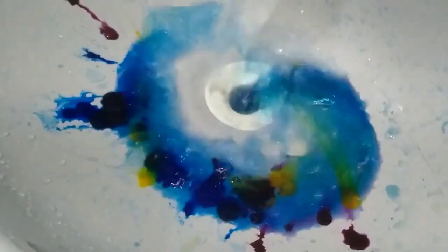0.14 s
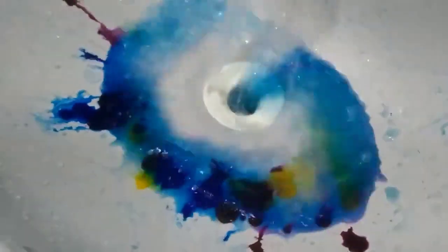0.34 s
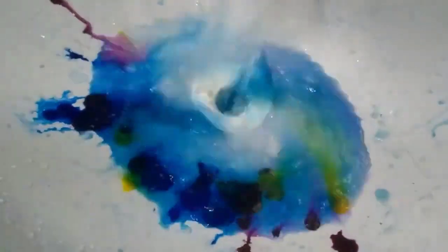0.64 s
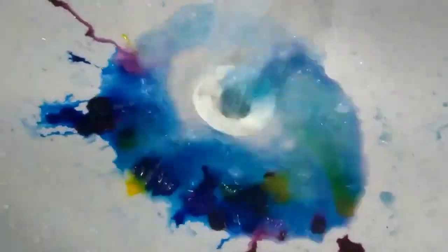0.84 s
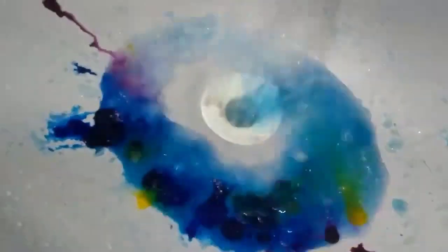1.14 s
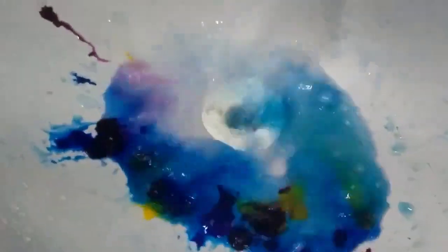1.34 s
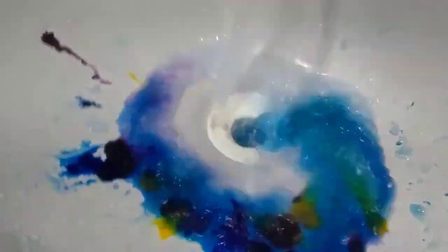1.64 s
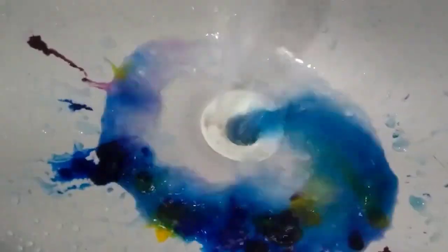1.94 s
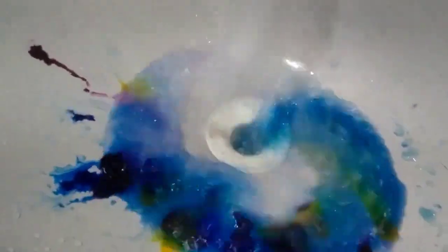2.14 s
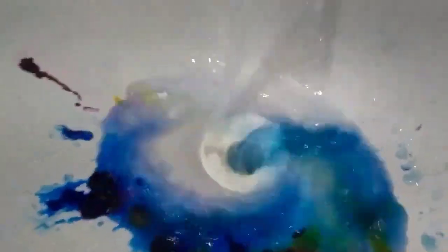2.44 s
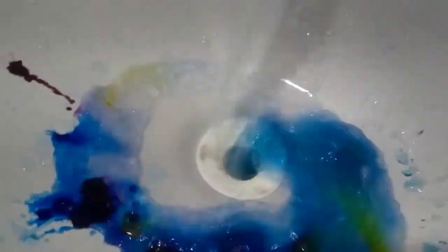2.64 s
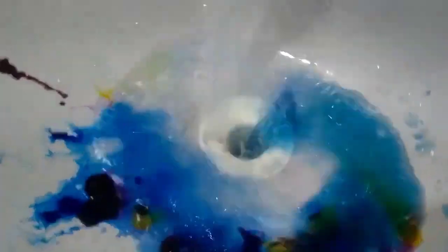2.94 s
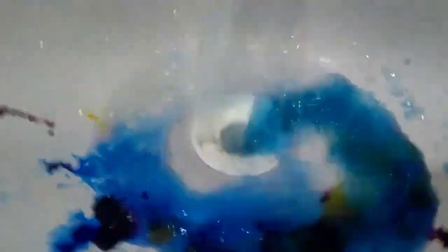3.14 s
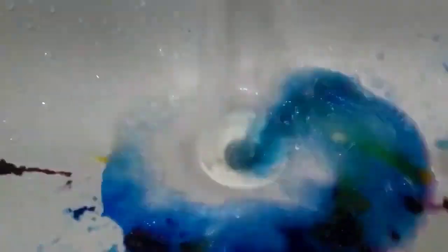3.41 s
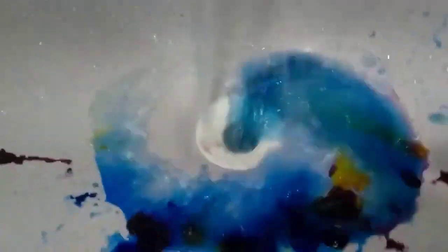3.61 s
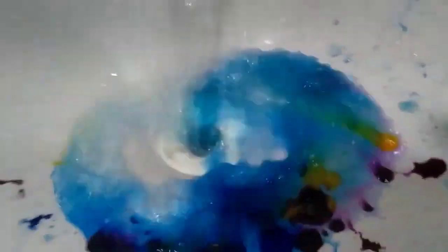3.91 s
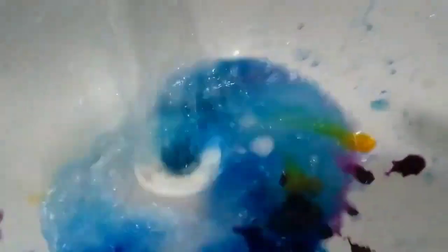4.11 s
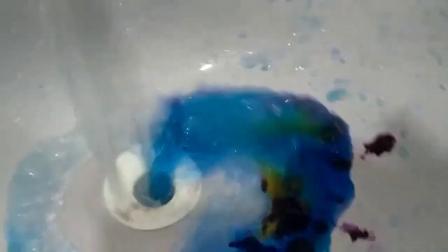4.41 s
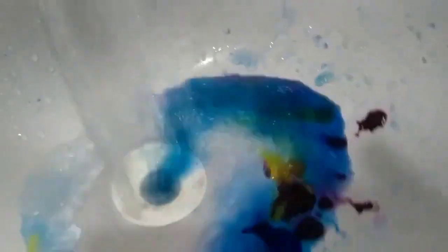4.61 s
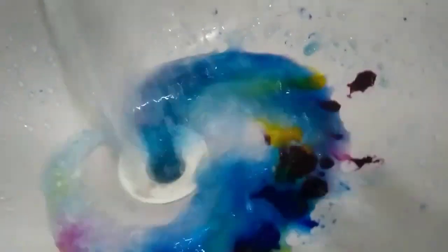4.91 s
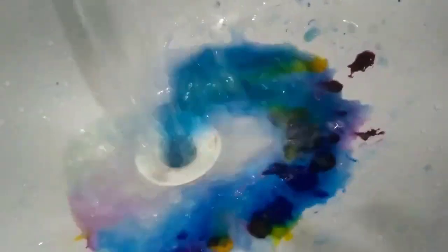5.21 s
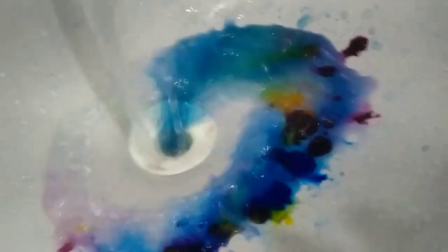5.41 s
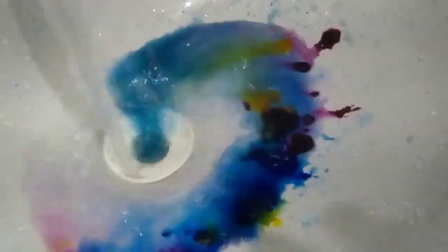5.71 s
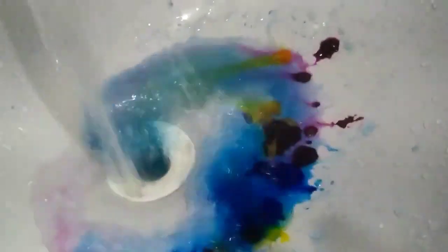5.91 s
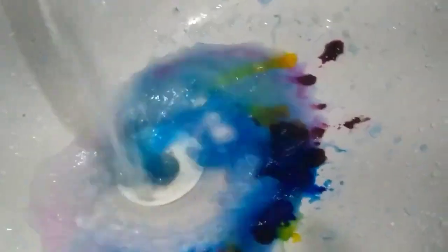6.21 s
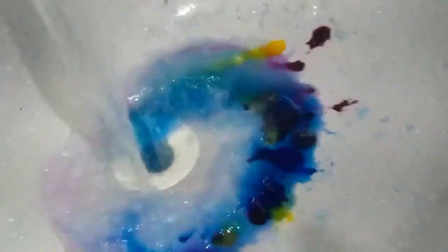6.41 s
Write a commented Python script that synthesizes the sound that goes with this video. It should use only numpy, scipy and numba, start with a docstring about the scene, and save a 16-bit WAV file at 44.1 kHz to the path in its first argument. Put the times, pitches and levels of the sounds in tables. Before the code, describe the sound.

Heard from close above a ceramic washbasin, a tap jet runs without pause, making a bright hiss of spray and a fizz of tiny bubbles. Several times a second it gulps air, giving short gurgles round the drain. Clear blips chirp upward, bubbles pop wetly and droplets tick on the glaze. A faint low bowl rumble lies beneath, and the tiles add a short tail.

```python
"""In a small tiled bathroom a tap runs steadily into a ceramic washbasin, heard from close above.
The jet hisses as spray (a dense crowd of droplet ticks) and fizzes as splash (a crowd of tiny bubbles).
A few times a second it gulps air into the water round the drain, which gurgles and churns (larger bubbles).
Single bubbles blip and pop and droplets tick, each a short ring. Filtered noise makes the faint rumble
of the bowl and the ring of the waste pipe; the tiles add a short echoing tail."""
import sys
import numpy as np
from scipy import signal
from scipy.fft import rfft, irfft
from scipy.io import wavfile
from scipy.ndimage import uniform_filter1d
from numba import njit

SR = 44100
rng = np.random.default_rng(int(sys.argv[2]) if len(sys.argv) > 2 else 0)


def master_out(mix):
    """Clip the mix to full scale and print it as 16-bit PCM to the path in sys.argv[1]."""
    frames = np.transpose(np.atleast_2d(mix))
    ceiling = np.clip(frames, -1, 1)
    pcm = np.round(ceiling * 32767).astype(np.int16)
    wavfile.write(sys.argv[1], SR, pcm)


N = 288855
TOP_HZ = 15400  # upper limit of the whole sound


def undb(db):
    """Turn decibels into a gain."""
    return 10 ** (np.asarray(db) / 20)


def controls(table):
    """Draw each column of a time table as a curve with a value at every sample."""
    s, *columns = np.transpose(table)
    t = np.arange(N) / SR
    return [np.interp(t, s, column) for column in columns]


def bins():
    """List the frequencies in the spectrum of a whole signal, in Hz."""
    return np.arange(N // 2 + 1) * SR / N


def along(points, hz):
    """Read a table of (f/Hz, value) at any frequency, spacing pitches as the ear does."""
    f, value = np.transpose(points)
    return np.interp(np.log(hz + 1), np.log(f), value)


def shape(x, gain):
    """Filter a sound with one gain for each frequency."""
    return irfft(rfft(x) * gain, N)


def resonances(modes):
    """Gain at each frequency of objects that ring at (f/Hz, width/Hz, level/dB); their powers add."""
    f = bins() + 1
    power = 0
    for hz, width, db in modes:
        offset = (f * f - hz * hz) / (f * width)
        power = power + undb(db) ** 2 / (1 + offset ** 2)
    return np.sqrt(power)


def walk(rate):
    """Wander smoothly at random, with about `rate` new values a second and a spread of 1."""
    k = max(int(SR / rate), 2)
    steps = np.repeat(rng.standard_normal(N // k + 1), k)
    w = uniform_filter1d(steps, k)[:N]
    return w / w.std()


@njit
def ring(start, hz, swell, size, phase, glide):
    """Each bubble swells, dies away and, if it glides, rises in pitch as it nears the surface; two phases."""
    out = np.zeros((2, N))
    for k in range(len(start)):
        first, width = int(start[k] * SR), swell[k] * SR
        turn = np.exp(2j * np.pi * hz[k] / SR - 1 / width)  # one sample of ringing and fading
        bend = np.exp(2j * np.pi * hz[k] / SR * glide[k] / (8 * width))  # one sample of rising pitch
        z = size[k] * np.e / width + 0j
        a, b = np.exp(1j * phase[k, 0]), np.exp(1j * phase[k, 1])
        for i in range(min(int(8 * width), N - first)):
            out[0, first + i] += i * (z * a).imag
            out[1, first + i] += i * (z * b).imag
            z *= turn
            turn *= bend
    return out


def cloud(count, low_hz, high_hz, cycles, spread_db, glide):
    """A crowd of rings at random, many weak and a few strong, with the same average energy at every pitch."""
    u = rng.random((count, 6))
    start = u[:, 0] * N / SR
    hz = low_hz + (high_hz - low_hz) * u[:, 1]
    swell = cycles * 2 ** (2 * u[:, 2] - 1) / hz  # half to twice the given number of cycles
    extra_db = spread_db * np.minimum(-np.log(1 - u[:, 3]), 2 * np.e)
    size = undb(extra_db) / np.sqrt(swell)
    return ring(start, hz, swell, size, 2 * np.pi * u[:, 4:], glide * np.ones(count))


# How alike the sound is at the two microphone ports: f/Hz, likeness [-1 opposite to 1 same]
PORT_LIKENESS = [(40, -0.84), (120, 0.048), (300, 0.42), (600, 0.81), (900, 0.94), (1200, 1), (1600, 0.69),
                 (1950, -0.73), (2200, -0.982), (2500, -1.0), (2750, -0.5), (3300, 0.6), (3850, 0.94),
                 (4400, 0.02), (5000, -0.83), (5650, 0.22), (6300, 0.73), (6900, 0.12), (7300, -0.93),
                 (7700, -0.74), (8100, 0.89), (8600, 0.32), (9400, 0.042), (10500, -0.12), (14000, 0.045)]


def ports(pair, colour, level_db):
    """Two nearby ports hear some pitches alike and others opposite; colour a pair of sounds and mix it so."""
    alike = np.clip(along(PORT_LIKENESS, bins()), -.996, .996)
    mid, side = shape(pair, colour * np.sqrt([1 + alike, 1 - alike]))
    return np.array([mid + side, mid - side]) / mid.std() * undb(level_db)


def close(s, db, hz, swell, glide, pan_db=0):
    """Rings so near the microphone that their pitch sets the phase between the ports."""
    apart = np.arccos(np.clip(1.7 * along(PORT_LIKENESS, hz), -1, 1))
    phase = 2 * np.pi * rng.random(len(s)) + np.array([0 * apart, apart])
    db = db - 10 * np.log10((undb(pan_db) + undb(-pan_db)) / 2)  # the same power wherever it lands
    swell = np.maximum(swell, 4 / SR)
    glides = glide * np.ones(len(s))

    def heard(port_db):
        """Play every ring at the level that one port hears."""
        return ring(s.copy(), hz.copy(), swell, undb(port_db), phase.T.copy(), glides)

    left = heard(db + pan_db / 2)[0]
    right = heard(db - pan_db / 2)[1]
    return np.array([left, right])


ROOM_T60_S, ROOM_DB = 0.2, -7  # time for the tail to fall by 60 dB, and its gain


def bathroom(x):
    """Tiles return a short, dense tail whose pattern drifts, in a one-second cycle, as the microphone moves."""
    t = np.arange(SR // 2) / SR
    fade = np.exp(-np.log(1000) * t / ROOM_T60_S) * (t > .004)
    centre = np.array([x[0] + x[1], x[0] - x[1]]) / 2
    turn = 2 * np.pi * np.arange(N) / SR
    out = 0
    for weight in (np.cos, np.sin):
        tail = rng.standard_normal((2, len(t))) * fade
        tail /= np.sqrt(np.sum(tail ** 2, axis=1, keepdims=True))
        out = out + weight(turn) * signal.fftconvolve(centre, tail, axes=1)[:, :N]
    mid, side = undb(ROOM_DB) * out
    return np.array([mid + side, mid - side])


# Where the bowl and the space around it ring: f/Hz, width/Hz, level/dB [relative]
BOWL_RESONANCES = [(80, 13, -11), (112, 19, -2.5), (131, 20, -11), (147, 22, 4), (179, 27, 2),
                   (207, 10.4, 10), (245, 21, -7), (316.7, 15, 9.5), (445, 28, -35), (525, 16, -34)]
# Rumble of the bowl, before the gains below: t/s, hollow part level/dB, deepest part level/dB
RUMBLE_LEVELS = [(0.0, -55, -66), (0.2, -56, -59), (0.6, -65.5, -63), (1.15, -56.5, -56), (1.6, -61, -68),
                 (1.9, -61, -56), (2.27, -54, -62.5), (2.43, -64.5, -68.0), (2.68, -52, -63),
                 (2.81, -64.5, -70), (3.17, -54.5, -53), (3.35, -60.5, -63.5), (3.57, -53.5, -56.5),
                 (3.93, -65.5, -65), (4.5, -59.5, -66), (4.66, -54, -70), (4.82, -59.5, -70),
                 (5.27, -66.5, -81), (5.55, -59.5, -66.5), (6.07, -59, -62), (6.15, -53, -78),
                 (6.42, -53, -60), (6.55, -63, -83)]
RUMBLE_HZ = 136  # the deepest part lies below this
DRONE_DB, DEEP_DB = 3, 1.8  # gain of the hollow part and of the deepest


def rumble(drone_db, deep_db):
    """The jet's unsteady push shakes the bowl's resonances; the deepest also come and go on their own."""
    f = bins() + 1
    bowl = resonances(BOWL_RESONANCES) / np.sqrt(1 + (55 / f) ** 4)  # weaker below 55 Hz
    deep_share = 1 / (1 + (f / RUMBLE_HZ) ** 10)
    throb = walk(25)
    drone_db = drone_db + DRONE_DB + 1.4 * throb
    drone = ports(rng.standard_normal((2, N)), bowl * np.sqrt(1 - deep_share), drone_db)
    deep_db = deep_db + DEEP_DB + throb + 0.89 * walk(8.1)
    deep = ports(rng.standard_normal((2, N)), bowl * np.sqrt(deep_share), deep_db)
    return drone + deep


# Faint ring of the waste pipe, before its gain and wavering: t/s, level/dB
PIPE_LEVELS = [(0, -82), (4.2, -68), (5.15, -84), (5.29, -58), (5.4, -69), (5.55, -50), (5.66, -53.5),
               (5.77, -64), (6.1, -57), (6.26, -52), (6.4, -60), (6.55, -62)]
PIPE_HZ, PIPE_WIDTH_HZ = 726, 9.1  # pitch, and width of one pass of the filter
PIPE_DB, PIPE_WAVER_DB = -1, 4  # gain, and how much it wavers


def pipe(level_db):
    """The outflow keeps one narrow resonance of the waste pipe ringing, now stronger, now weaker."""
    colour = resonances([(PIPE_HZ, PIPE_WIDTH_HZ, 0)]) ** 2  # two passes
    return ports(rng.standard_normal((2, N)), colour, level_db + PIPE_DB + PIPE_WAVER_DB * walk(9))


# Where the hollow under the plughole rings: f/Hz, width/Hz, level/dB [relative]
DRAIN_RESONANCES = [(319.7, 30, 5), (332, 28, -10), (364, 28, -3.5), (426, 49, -2.5), (446, 20, 1),
                    (526, 27, 1.5), (576, 81, -4.5), (600, 39, -10.5), (747, 58, -8.5), (836.4, 11.4, 8)]


def churn(level_db, surge):
    """Air pockets collapse with short thuds that ring the hollow under the plughole."""
    pockets = cloud(count=2600, low_hz=221.4, high_hz=1054, cycles=1.75, spread_db=2.5, glide=0.19)
    return ports(pockets, resonances(DRAIN_RESONANCES), level_db + 1.6 * surge)


# Colour of the gurgle: f/Hz, level/dB [relative]
GURGLE_COLOUR = [(500, -68), (680, -9.5), (820, -1.5), (960, 7.5), (1300, 8), (1900, 11), (2300, 11),
                 (3200, -27)]


def gurgle(level_db, surge):
    """Larger bubbles ring in the swirl: a crowd of short ones, and a few that ring on and chirp upward."""
    short = cloud(count=4200, low_hz=630.0, high_hz=2706, cycles=2.01, spread_db=0.57, glide=0.066)
    clear = cloud(count=170, low_hz=796, high_hz=1469, cycles=5.0, spread_db=0.5, glide=0.17)
    bubbles = short / short.std() + undb(-10.5) * clear / clear.std()
    colour = undb(along(GURGLE_COLOUR, bins()))
    return ports(bubbles, colour, level_db + 0.91 * surge + 0.93 * walk(24))


# Gulps of air dragged under by the jet, before the gain of each layer:
# t/s [at the height], small bubbles level/dB, air pockets level/dB, length/s
AIR_GULPS = [(0.116, -42, -64, 0.059), (0.414, -25.5, -45.5, 0.083), (0.698, -26, -42, 0.15),
             (0.873, -24.5, -36.5, 0.043), (1.014, -29.5, -58, 0.16), (1.161, -26, -40, 0.12),
             (1.3, -36, -60, 0.04), (1.429, -29, -44, 0.14), (1.654, -40, -48, 0.049),
             (1.867, -28, -40, 0.092), (2.15, -28.5, -45, 0.11), (2.588, -36, -46, 0.076),
             (2.667, -38, -52.5, 0.11), (2.877, -31.5, -51, 0.16), (3.127, -29.5, -41.5, 0.12),
             (3.277, -31, -49, 0.082), (3.426, -25, -38, 0.086), (3.53, -30.5, -51, 0.07),
             (3.618, -21, -35, 0.018), (3.704, -49, -42, 0.078), (3.946, -35, -43.5, 0.064),
             (4.238, -36, -62, 0.064), (4.295, -26, -38.5, 0.091), (4.585, -29.5, -42.5, 0.15),
             (4.93, -37, -49, 0.13), (5.353, -31, -47, 0.032), (5.526, -31, -39.5, 0.022),
             (5.56, -42, -44, 0.053), (5.91, -32.5, -46.5, 0.1), (6.114, -32, -46.5, 0.089),
             (6.363, -30.5, -54, 0.13), (6.451, -29.5, -60, 0.047)]


def gulps():
    """Each gulp of air swells and fades; add up the power of its small bubbles and of its air pockets."""
    t = np.arange(N) / SR
    bubbles, pockets = 0, 0
    for s, bubbles_db, pockets_db, length in AIR_GULPS:
        swell = np.exp(-2 * (2 * (t - s) / length) ** 2)
        bubbles = bubbles + undb(bubbles_db) ** 2 * swell
        pockets = pockets + undb(pockets_db) ** 2 * swell
    return bubbles, pockets


def lifted(steady_db, power, gain_db):
    """Level in dB of a steady sound with the power of the gulps on top."""
    return 10 * np.log10(undb(steady_db) ** 2 + power * undb(gain_db) ** 2)


STRAY_DB, FLICK_DB = -51, -59.5  # lesser bubbles and flung droplets, at the usual force of the jet


def strays(jet_db):
    """Lesser bubbles pop and flung droplets tick at random, louder when the jet hits harder."""
    bubbles = cloud(count=150, low_hz=2597, high_hz=6380, cycles=11.0, spread_db=1.5, glide=0.047)
    droplets = cloud(count=70, low_hz=7000, high_hz=14000, cycles=1.0, spread_db=9.5, glide=0)
    return ports(bubbles, 1, STRAY_DB + jet_db) + ports(droplets, 1, FLICK_DB + jet_db)


# Fragments of a droplet: gain, spread in time (s) and pitch (octaves each way), swell (cycles)
SHATTER_DB, SHATTER_S, SHATTER_OCTAVES, SHATTER_CYCLES = -8.5, 0.0026, 0.39, 1.2


def shatter(s, db, hz, count):
    """Each droplet breaks into a few fragments that click around its pitch, each a little apart in time."""
    when, detune, left, right = rng.random((len(s), count, 4)).reshape(-1, 4).T
    s, db, hz = np.repeat([s, db, hz], count, axis=1)
    hz = np.minimum(hz * 2 ** (SHATTER_OCTAVES * (2 * detune - 1)), TOP_HZ)
    start = s + SHATTER_S * (when - .5)
    phase = 2 * np.pi * np.column_stack([left, right])
    return ring(start, hz, SHATTER_CYCLES / hz, undb(db), phase, np.zeros(len(s)))


# Flung droplets that tick on the glaze: t/s, peak level/dB, f/Hz, left minus right level/dB
DROPLET_TICKS = [(0.137, -21, 5580.0, -5.0), (0.3799, -25.0, 11310.0, 1.0), (0.383, -19, 5430.0, -1.0),
                 (0.4854, -18, 5150.0, -3.0), (0.5585, -23.5, 5110.0, -5), (0.618, -19, 5280.0, -5.0),
                 (0.6303, -18, 5050.0, -5.0), (0.7348, -26, 5420.0, -1.0), (0.7666, -19, 5520.0, -6.0),
                 (0.8055, -18.0, 5270.0, -5.0), (0.8428, -16, 5060.0, -4), (0.8608, -25, 5430.0, -8.0),
                 (0.8952, -19, 5210.0, -6), (1.04, -12, 5070, -4), (1.0631, -22.5, 11920.0, -2.0),
                 (1.1067, -10, 5160, -2.0), (1.2107, -16.5, 5480.0, -6.0), (1.2212, -23.5, 10920.0, -1.0),
                 (1.3025, -24, 6270.0, 3.0), (1.3497, -24, 9220.0, -3.0), (1.3607, -18, 6550, -1.0),
                 (1.4026, -14, 5400, 2), (1.4564, -19.0, 5160.0, 0.0), (1.4866, -20, 4990.0, -2.0),
                 (1.4934, -23, 12400.0, -1.0), (1.5348, -20, 5430.0, 1.0), (1.5885, -21, 5840, -7),
                 (1.6428, -25, 6140.0, -3.0), (1.663, -27, 5150.0, -1.0), (1.7124, -17.0, 5240.0, -8),
                 (1.8545, -24.5, 5000.0, -6.0), (2.0114, -24, 5040.0, -2.0), (2.106, -12.5, 5210.0, -12),
                 (2.1247, -18.5, 5030.0, -2.0), (2.263, -18.0, 5190.0, -3.0), (2.31, -21, 5850.0, -3.0),
                 (2.3267, -23, 5700, -9.0), (2.3388, -10.5, 5280.0, -3), (2.4015, -18, 4920.0, -1),
                 (2.443, -23, 5130.0, -4.0), (2.4681, -23.0, 10440.0, -2.0), (2.55, -23, 9800.0, -4.0),
                 (2.595, -18, 4870, -1.0), (2.738, -24.0, 5020.0, -1), (2.8745, -25.5, 10520.0, -3.0),
                 (2.8902, -21, 6560, 2.0), (2.9403, -23.5, 9520.0, 1.0), (3.071, -11.5, 5370, -5),
                 (3.1429, -13, 4770.0, -2), (3.2072, -20.0, 4920.0, 0), (3.2276, -9, 5100.0, 0),
                 (3.2651, -22, 11080.0, -8.0), (3.2763, -25.5, 13370.0, -4.0), (3.4596, -30, 5510.0, -3.0),
                 (3.4664, -24.0, 9260.0, -2.0), (3.5295, -18, 5090.0, 1.0), (3.6258, -19.5, 8660, -2.0),
                 (3.8103, -28, 11600.0, 4), (3.8256, -22.0, 14130.0, -1.0), (3.9286, -23.0, 12140.0, 2.0),
                 (3.9842, -27, 12770.0, -2.0), (4.0038, -15, 4650, 10), (4.3105, -13, 5090, 4),
                 (4.3973, -19, 5960.0, 3), (4.604, -18, 11100, -1), (4.626, -16, 4740.0, 9.0),
                 (4.74, -19, 11600, -2.0), (5.0226, -21, 5400, 8), (5.0323, -24, 10410.0, -5.0),
                 (5.086, -20, 11200, 0), (5.3064, -25, 12950.0, -2.0), (5.5619, -25, 6200.0, 5.0),
                 (5.5743, -19, 5450, -4.0), (5.616, -21.5, 9610.0, -3.0), (5.7537, -19, 5400, 9.0),
                 (6.0088, -19, 5560.0, 9.0), (6.0767, -20, 5340.0, 7.0), (6.3383, -22, 5370.0, 5.0),
                 (6.4187, -25, 10310.0, 1.0), (6.5097, -16, 11900, 2)]
TICK_DB, TICK_SWELL_S = 0, 0.0004  # gain and swell time of every tick


def ticks():
    """Droplets hit the wet glaze: a very short, high ring amid the crackle of their fragments."""
    s, db, hz, pan_db = np.transpose(DROPLET_TICKS)
    swell = np.full(len(s), TICK_SWELL_S)
    rings = close(s, db + TICK_DB, hz, swell, glide=0.063, pan_db=pan_db)
    return rings + shatter(s, db + SHATTER_DB, hz, count=6)


# Large bubbles that blip out of the swirl, before their gain:
# t/s, peak level/dB, starting f/Hz, swell time/s, rise [share of the starting pitch]
BUBBLE_BLIPS = [(0.366, -19.5, 928, 0.0035, 0.25), (0.3955, -18, 920, 0.0014, 0.1),
                (0.512, -19, 1028, 0.0056, 0.92), (0.566, -27.5, 980, 0.003, 0.2),
                (0.645, -24, 933, 0.0095, 0.44), (0.705, -17.5, 887, 0.0036, 0.17),
                (0.844, -18, 1320, 0.0022, 0.22), (0.866, -18, 1330, 0.0019, 0.1),
                (0.9895, -16.5, 1390, 0.0015, 0.1), (1.001, -22, 890, 0.0025, 0.3),
                (1.011, -20.5, 1265, 0.0034, 0.33), (1.134, -15.5, 1110, 0.0021, 0.31),
                (1.185, -22, 990, 0.0042, 0.17), (1.293, -17.5, 1370, 0.0015, 0.15),
                (1.409, -17.5, 1300, 0.0028, 0.32), (1.459, -24, 953, 0.0059, 0.36),
                (1.945, -30, 910, 0.0069, 0.23), (2.222, -29, 920, 0.0063, 0.081),
                (2.3, -34, 880, 0.004, 0.2), (2.454, -29.5, 1047, 0.0065, 0.2),
                (2.507, -26, 1140, 0.0026, 0.22), (2.56, -20.5, 1320, 0.0023, 0.2),
                (2.659, -23, 994, 0.0035, 0.26), (2.694, -32, 970, 0.004, 0.1),
                (2.839, -19, 1340, 0.0037, 0.2), (2.881, -20, 1020, 0.0031, 0.2),
                (2.93, -16.5, 1040, 0.0022, 0.11), (2.942, -23, 910, 0.0033, 0.28),
                (3.0875, -16, 1010, 0.0041, 0.41), (3.173, -24, 1025, 0.0032, 0.2),
                (3.446, -22.5, 1265, 0.0042, 0.2), (3.524, -20, 1060, 0.0025, 0.42),
                (3.545, -20.5, 1095, 0.003, 0.22), (3.62, -17, 1400, 0.0027, 0.45),
                (3.947, -17.5, 1120, 0.002, 0.18), (4.073, -22, 1050, 0.0027, 0.2),
                (4.2, -18, 1036, 0.0037, 0.2), (4.247, -25, 1010, 0.0023, 0.2),
                (4.912, -36, 995, 0.0055, 0.65), (4.986, -36, 730, 0.0059, 0.43),
                (5.196, -32, 1205, 0.005, 0.65), (5.232, -40.5, 823, 0.012, 0.38),
                (5.35, -29, 1410, 0.0023, 0.27), (5.436, -26.5, 930, 0.0028, 0.22),
                (5.65, -26, 1510, 0.0034, 0.23), (5.914, -25, 1260, 0.0044, 0.66),
                (5.928, -22.5, 883, 0.0054, 0.3), (6.011, -26, 903, 0.0075, 0.21),
                (6.205, -22, 1030, 0.0037, 0.3), (6.354, -18.5, 1015, 0.003, 0.37),
                (6.379, -22, 990, 0.0034, 0.25), (6.458, -21.5, 933, 0.0054, 0.11)]
BLIP_DB = -4.5  # gain of every blip


def blips():
    """Large bubbles ring clearly and chirp upward as they rise through the swirl."""
    s, db, hz, swell, rise = np.transpose(BUBBLE_BLIPS)
    return close(s, db + BLIP_DB, hz, swell, rise)


# Colour of the wet snap of a bursting bubble: f/Hz, level/dB [relative]
SNAP_COLOUR = [(500, -24), (1200, -30), (3000, 9), (5500, 10), (8000, -4), (15000, -19)]


def snaps(s, db, swell):
    """A tearing film gives a wet burst of noise that rises and fades with the ring of its bubble."""
    burst = np.zeros(N + SR)
    age = np.arange(SR // 40) / SR
    for start, size, rise in zip(s, undb(db), np.maximum(swell, 4 / SR)):
        burst[int(start * SR) + np.arange(len(age))] += size * age / rise * np.exp(1 - age / rise)
    colour = undb(along(SNAP_COLOUR, bins()))
    return burst[:N] * ports(rng.standard_normal((2, N)), colour, 0)


# The loudest small bubbles that burst at the surface:
# t/s, peak level/dB, f/Hz, swell time/s, snap level/dB [against the ring]
BUBBLE_POPS = [(0.1132, -18, 1350, 0.0017, -12), (0.1152, -19, 3740, 0.00055, -14),
               (0.462, -16.5, 4090, 0.00083, -17), (0.7398, -16, 3380, 0.001, -13),
               (0.8685, -16, 2200, 0.0013, -16), (1.1722, -17, 4250, 0.0017, -8),
               (1.508, -19.5, 4060, 0.0013, -16), (2.064, -14, 3290, 0.0012, -26),
               (2.1728, -8, 3380, 0.0011, -30), (2.32, -23.5, 3270, 0.0022, -17),
               (2.4023, -26, 3890, 0.0019, -18), (2.6497, -11.5, 3375, 0.0015, -35),
               (2.7576, -15, 1490, 0.00089, -16), (2.7594, -8, 1860, 0.00079, -16),
               (3.171, -16.5, 3240, 0.0011, -10), (3.274, -14, 2290, 0.003, -19),
               (3.41, -15, 2780, 0.0042, -26), (3.4178, -15, 2190, 0.0021, -24),
               (3.6496, -13, 2250, 0.0009, -33), (3.7879, -14, 2900, 0.00047, -9),
               (3.911, -19, 1850, 0.0011, -21), (3.9155, -21, 3540, 0.0033, -27),
               (3.9305, -16, 3050, 0.0011, -25), (4.3103, -14, 1090, 0.00058, -6),
               (4.438, -15, 3080, 0.0011, -29), (4.5923, -20, 1780, 0.0018, -23),
               (4.7262, -25, 4050, 0.0011, 2), (4.815, -23, 2880, 0.0021, -31),
               (5.1897, -25, 4030, 0.0022, -13), (5.3057, -21, 2680, 0.0021, -28),
               (5.439, -27, 3990, 0.0022, -18), (5.898, -18.5, 3560, 0.00057, 0),
               (6.091, -15, 2520, 0.00077, -11), (6.4085, -18.5, 3650, 0.00098, -12),
               (6.4889, -19, 4020, 0.00076, -2)]


def pops():
    """Single loud bubbles at the surface: a ring, and a wet snap as the film tears; they give off little bass."""
    s, db, hz, swell, snap_db = np.transpose(BUBBLE_POPS)
    both = close(s, db, hz, swell, glide=0.029) + snaps(s, db + snap_db, swell)
    no_bass = signal.butter(2, 400, "high", fs=SR, output="sos")
    return signal.sosfilt(no_bass, both)


# Colour of the splash: f/Hz, level/dB [relative]
SPLASH_COLOUR = [(1200, -48), (1800, 0.5), (2300, 4), (2500, 0.5), (2700, 7), (3050, 2), (3400, 3),
                 (4300, -2.5), (5200, -1.5), (6300, -6.5), (7400, -5.5), (8000, -5)]
# Splash scattered by the sides of the bowl, more of it once the microphone moves in:
# t/s, level/dB [against the direct splash]
SCATTER_SHARE = [(0, -9.5), (3.1, -32), (3.4, -6), (5.0, -2), (6.55, -9)]


def splash(level_db, surge):
    """Tiny bubbles fizz where the jet breaks up; what the bowl scatters reaches the two ports unrelated."""
    fizz = cloud(count=26000, low_hz=1230, high_hz=7538, cycles=4.65, spread_db=2.0, glide=0.023)
    colour = undb(along(SPLASH_COLOUR, bins()))
    direct = ports(fizz, colour, 0)
    echoes = cloud(count=26000, low_hz=1517, high_hz=7350, cycles=3.5, spread_db=1.0, glide=0.046)
    scattered = shape(echoes, colour)
    share = undb(controls(SCATTER_SHARE)[0])
    both = direct + share * np.sqrt(2) * scattered / scattered.std()
    return both / np.hypot(1, share) * undb(level_db + 1.65 * surge)


# Colour of the spray: f/Hz, level/dB [relative]
SPRAY_COLOUR = [(3000, 0), (6000, -2), (7350, -7.5), (8050, -0.5), (8700, 1.5), (9500, 2), (11000, 2.5),
                (13000, 2), (15000, -0.5), (17000, -41)]


def spray(level_db):
    """Fine droplets tick on the glaze so densely that they hiss."""
    droplets = cloud(count=90000, low_hz=3110, high_hz=17340, cycles=1.0, spread_db=0.5, glide=0)
    return ports(droplets, undb(along(SPRAY_COLOUR, bins())), level_db + 1.1 * walk(70))


SPLASH_DB, SPRAY_DB = -37, -40  # at the usual force, before flutter, surges and gulps
SPLASH_PER_JET, SPRAY_PER_JET = 1.84, 1  # dB for each dB of force
FLUTTER_PER_S, SPLASH_FLUTTER_DB, SPRAY_FLUTTER_DB = 20, 1, 1.25  # the stream wobbles as it falls
GURGLE_DB, CHURN_DB = -4.5, -1.9  # gain of each in the steady swirl
# gain of a gulp in each layer; the fizz of the splash goes with the small bubbles
GULP_GURGLE_DB, GULP_CHURN_DB, GULP_FIZZ_DB = -5.5, -1.1, -9.5
# Force of the jet on the bowl, which splash and spray both follow: t/s, level/dB [against its usual force]
JET_FORCE = [(0.0, 1), (0.22, -2.5), (0.45, -0.5), (1.28, 1), (1.96, -0.5), (2.17, 1.5), (2.33, 1.5),
             (2.38, -2), (2.62, -1), (3.26, 2), (3.35, -1), (3.47, 3.5), (3.7, 1), (3.85, 1.5), (4.32, 2),
             (4.52, -0.5), (4.63, 1.5), (4.73, 0), (4.8, -3), (5.4, -1), (6.55, 1.5)]
# Steady bubbling of the water that circles the drain, before the gains above:
# t/s, small bubbles level/dB, air pockets level/dB
SWIRL_LEVELS = [(0.0, -29.5, -64), (0.3, -35.5, -53), (1.3, -37.5, -61), (2.15, -34.5, -51),
                (2.35, -40.5, -66), (2.8, -33.5, -79), (3.0, -38.5, -63.0), (3.8, -30.5, -59.5),
                (4.25, -31.5, -44), (4.45, -37.5, -58), (4.78, -42.5, -60), (5.12, -49.5, -65),
                (5.3, -40, -67), (5.4, -38.5, -47.5), (5.7, -38.5, -61.5), (6.55, -36, -58)]


def scene():
    """The jet drives splash and spray, its gulps lift the bubbling, and the bubbles share its quick surges."""
    jet_db = controls(JET_FORCE)[0]
    bubbles_db, pockets_db = controls(SWIRL_LEVELS)
    bubbles, pockets = gulps()
    surge, flutter = walk(70), walk(FLUTTER_PER_S)
    spray_db = SPRAY_DB + SPRAY_PER_JET * jet_db + SPRAY_FLUTTER_DB * flutter
    steady_splash_db = SPLASH_DB + SPLASH_PER_JET * jet_db + SPLASH_FLUTTER_DB * flutter
    splash_db = lifted(steady_splash_db, bubbles, GULP_FIZZ_DB)
    gurgle_db = lifted(bubbles_db + GURGLE_DB, bubbles, GULP_GURGLE_DB)
    churn_db = lifted(pockets_db + CHURN_DB, pockets, GULP_CHURN_DB)
    water = churn(churn_db, surge) + gurgle(gurgle_db, surge)
    water = water + strays(jet_db) + ticks() + blips() + pops()
    water = water + splash(splash_db, surge) + spray(spray_db)
    background = rumble(*controls(RUMBLE_LEVELS)) + pipe(*controls(PIPE_LEVELS))
    return water + bathroom(water) + background


# Difference in colour between the two ports: f/Hz, left minus right level/dB
PORT_BALANCE = [(300, 0), (1150, 0), (1700, -5), (2400, -0.5), (3200, -1), (4400, 0), (5500, -2.5),
                (7500, 0.5), (11000, -2.5), (15000, -1)]


def record(dry):
    """The two ports differ a little in colour; a steep filter cuts the top."""
    tilt_db = along(PORT_BALANCE, bins()) / 2
    heard = shape(dry, undb([tilt_db, -tilt_db]))
    top_cut = signal.ellip(10, .2, 80, TOP_HZ, fs=SR, output="sos")
    return signal.sosfilt(top_cut, heard)


dry = scene()
out = record(dry)
master_out(out)
```